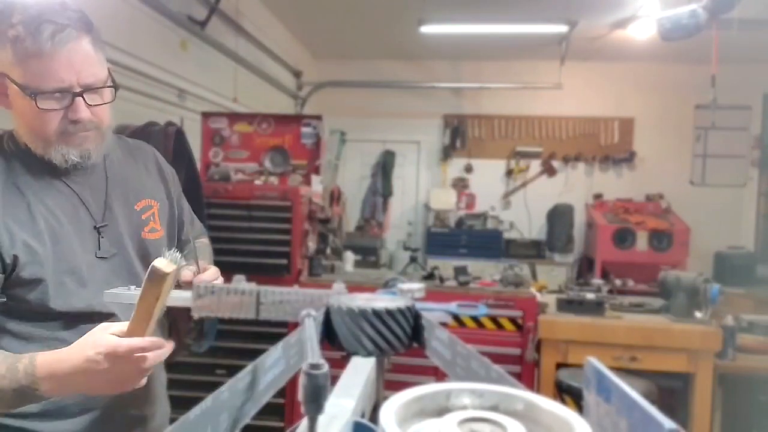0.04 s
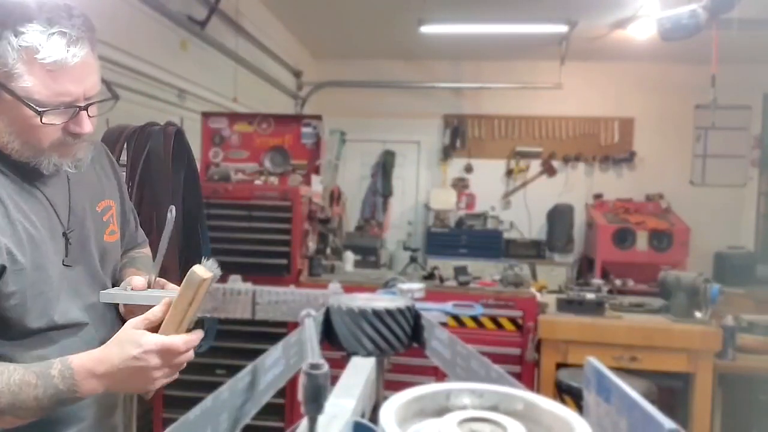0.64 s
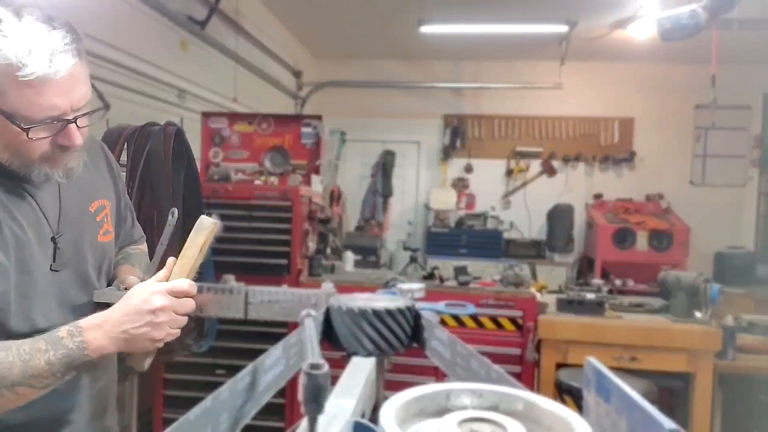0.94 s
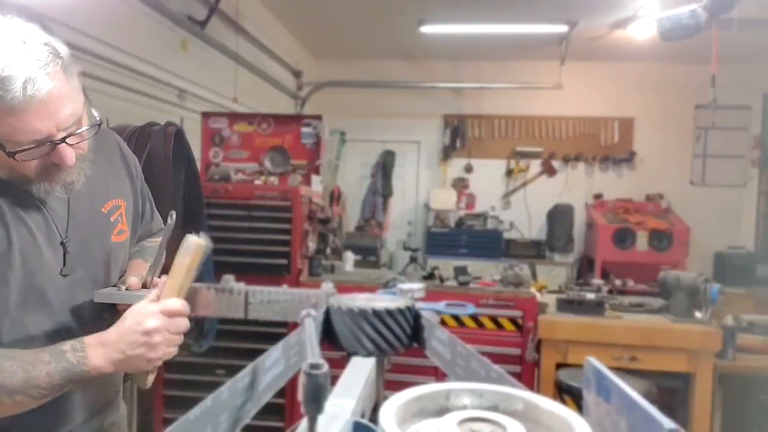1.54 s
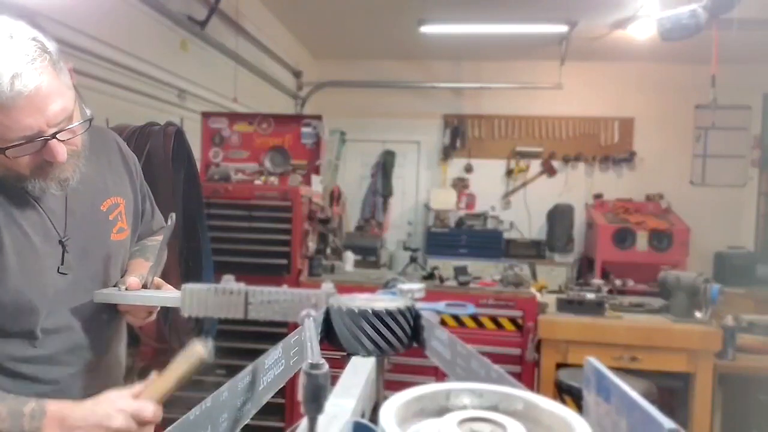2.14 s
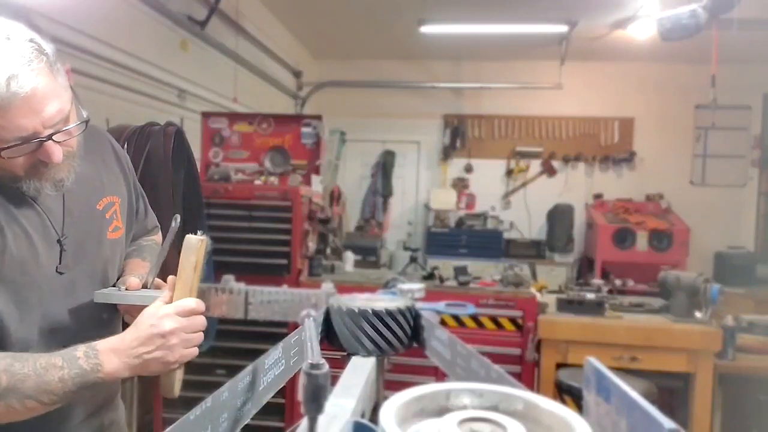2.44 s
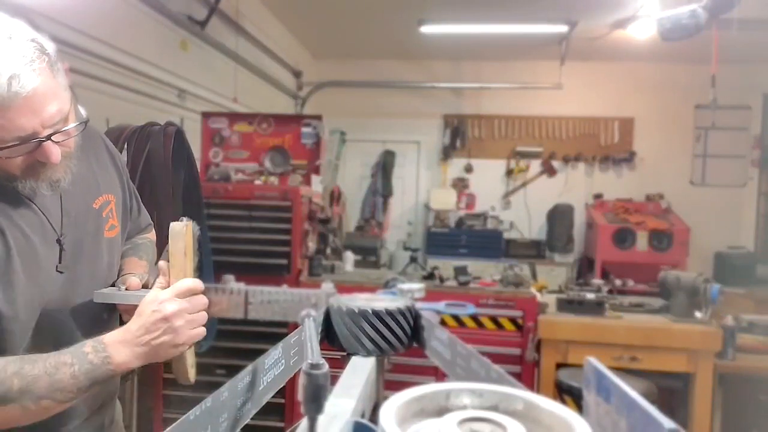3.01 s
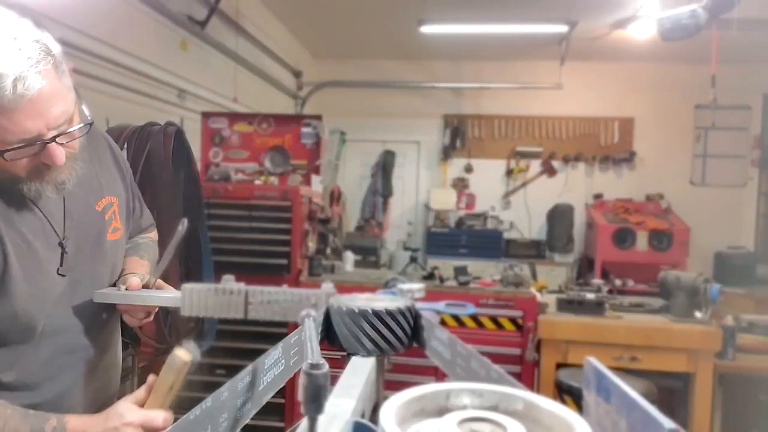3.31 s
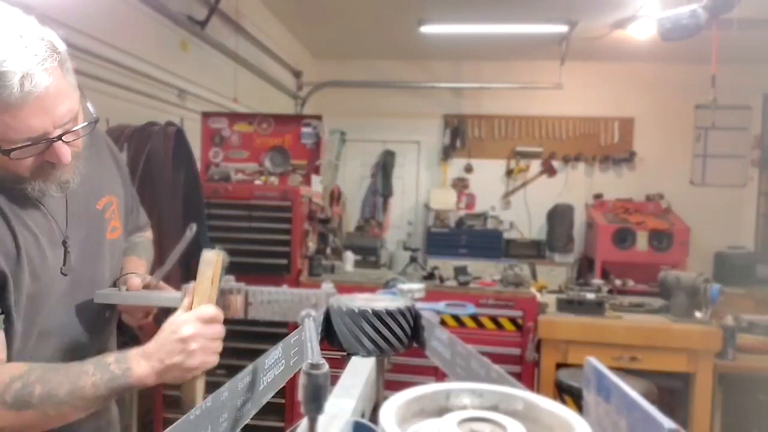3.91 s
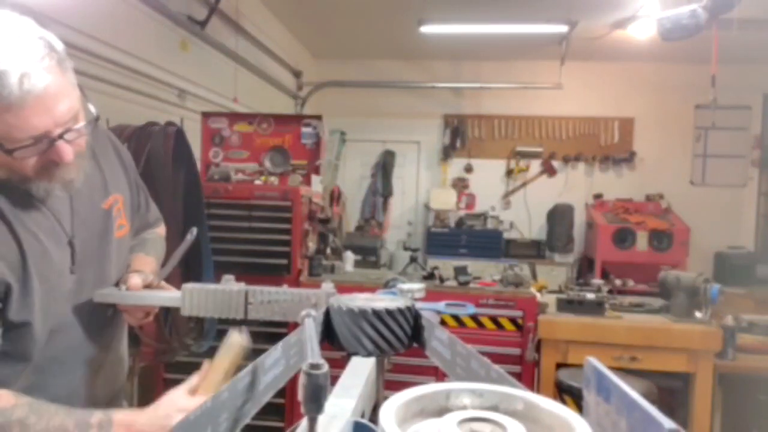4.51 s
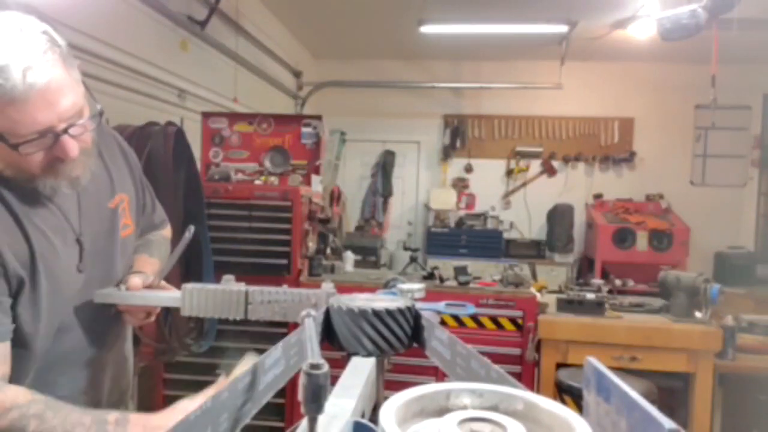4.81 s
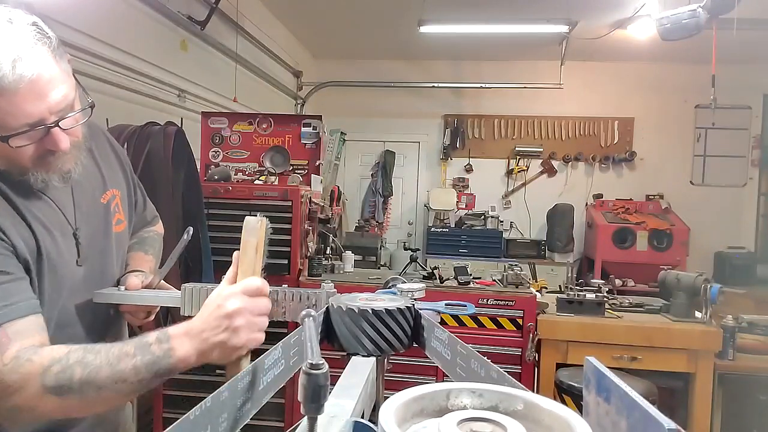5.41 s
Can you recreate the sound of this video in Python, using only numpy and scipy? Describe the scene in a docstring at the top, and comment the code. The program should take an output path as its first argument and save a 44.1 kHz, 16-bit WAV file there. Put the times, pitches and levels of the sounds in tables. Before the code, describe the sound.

Close, brisk wire brush strokes slap and rasp across steel, each shaking a metal stand into a low rumble.

```python
"""Wire brush on a steel blade

A garage, close up, with a stereo microphone standing on an idle belt grinder. A shoe scuffs and a blade
clanks and bumps down on the tool rest. A hand wire brush then slaps onto the steel, drags with a hiss
and flicks off the edge, stroke after stroke. Every blow shakes the grinder's frame into a low rumble
that reaches the microphone mostly through the metal, and the room throws the hiss back."""
import sys
import numpy as np
from scipy import signal
from scipy.fft import rfft, irfft, next_fast_len
from scipy.io import wavfile
from scipy.ndimage import uniform_filter1d

SR = 44100
rng = np.random.default_rng(int(sys.argv[2]) if len(sys.argv) > 2 else 0)


def wav_out(sig):
    """Save sig, one row per channel (or a flat mono array), as 16-bit PCM at SR to the path in sys.argv[1]."""
    wavfile.write(sys.argv[1], SR, np.round(np.clip(np.atleast_2d(sig).T, -1, 1) * 32767).astype(np.int16))


N = 244755
TIME = np.arange(N) / SR


def amp(db):
    """Decibels to gain."""
    return 10 ** (np.asarray(db) / 20)


def unit(x):
    """Scales to rms 1."""
    return x / np.sqrt(np.mean(x ** 2) + 1e-20)


def read(points, hz):
    """Reads a table along a log-frequency axis."""
    freq_hz, value = np.transpose(points)
    return np.interp(np.log(hz + 1), np.log(freq_hz + 1), value)


def add(mix, start_s, sound):
    """Mixes a sound in at start_s."""
    part = mix[max(round(start_s * SR), 0):][:len(sound)]
    part += sound[:len(part)]


def colour(x, spectrum, size=4096):
    """Causal filter with the shape of a spectrum; white noise keeps its power."""
    log_gain = np.log(amp(read(spectrum, abs(np.fft.fftfreq(size, 1 / SR)))))
    taps = np.fft.ifft(np.exp(np.conj(signal.hilbert(log_gain)))).real[:size // 2]
    return signal.oaconvolve(x, taps / np.linalg.norm(taps))[:N]


def drift(hz):
    """Random wander of rms 1, mostly slower than hz."""
    rolloff = 1 + (np.fft.rfftfreq(N, 1 / SR) / hz) ** 4
    return unit(irfft(rfft(rng.standard_normal(N)) / rolloff, N))


def slips(per_s, spread_db):
    """Tiny clicks of uneven size: wires or grit catching and letting go."""
    size = amp(spread_db * np.minimum(rng.exponential(1, N), 4)) * rng.standard_normal(N)
    return unit(size * (rng.random(N) < per_s / SR))


def burst(start_s, rise_s, fall_s):
    """Envelope of a cluster of contacts."""
    age = np.maximum(TIME - start_s, 0)
    return np.minimum(age / rise_s, 1) * np.exp(-np.maximum(age - rise_s, 0) / fall_s)


def ringing(modes):
    """One second of struck modes, with alternating signs and unit starting power."""
    t = TIME[:SR]
    power = sum(amp(db) ** 2 for _, db, _ in modes) / 2
    return sum((-1) ** k * amp(db) * np.exp(-np.log(1000) * t / t60) * np.sin(2 * np.pi * hz * t)
               for k, (hz, db, t60) in enumerate(modes)) / np.sqrt(power)


def chattering(modes, hits, relative_width):
    """Modes struck at (start_s, level_db); loose contact smears each into a narrow band of noise."""
    strikes, out = np.zeros((2, N))
    contact_samples = SR // 300
    for start_s, db in hits:
        add(strikes, start_s, np.full(contact_samples, amp(db) ** 2 / contact_samples))
    size = next_fast_len(N, True)
    hz, noise = np.fft.rfftfreq(size, 1 / SR), rfft(rng.standard_normal(size))
    for centre, db, t60 in modes:
        band = unit(irfft(noise / (1 + ((hz - centre) / (relative_width * centre)) ** 2), size)[:N])
        energy = signal.lfilter([1], [1, -np.exp(-2 * np.log(1000) / t60 / SR)], strikes + 1e-24)
        out += amp(db) * band * np.sqrt(energy)
    return out / np.sqrt(sum(amp(db) ** 2 for _, db, _ in modes))


# The garage with nothing moving: freq_hz, level_db
ROOM_TONE_SPECTRUM = [(20, -17), (60, 0), (120, -13), (250, -28), (1000, -39), (4000, -37), (8000, -38),
                      (15600, -44)]
def room_tone():
    """Faint, steady noise, mostly bass."""
    return colour(rng.standard_normal(N), ROOM_TONE_SPECTRUM)


# Scuffs on the concrete floor: start_s, level_db
SHOE_SCUFFS = [(0, -61.5), (.093, -45.5)]
# The sliding sole: freq_hz, level_db
SOLE_SPECTRUM = [(100, -22), (350, -17), (580, -7), (900, -18.5), (1250, -10), (1550, -13.5), (2100, -0.5),
                 (2450, -9), (2750, -4), (3400, -7.5), (4600, -13.5), (6500, -21.5), (10000, -25.5),
                 (15600, -28)]
def shoe(rise_s=0.012, fall_s=0.067):
    """Grit catches and slips under a sole."""
    slide = sum(amp(db) * burst(start_s, rise_s, fall_s) for start_s, db in SHOE_SCUFFS)
    return colour(slide * slips(per_s=6300, spread_db=2.5), SOLE_SPECTRUM)


# The brush lands on the blade or grazes it: start_s, slap_db, ping_hz, ping_db, push_db, clatter_db
BRUSH_LANDINGS = [(0.332, -84, 4100, -61.5, -94, -92), (0.828, -53, 3800, -56.5, -35.5, -65),
                  (0.853, -75, 3950, -82, -54, -73), (0.967, -73, 3900, -77, -50, -62),
                  (1.4638, -38, 3800, -45.5, -22, -41), (1.8563, -34, 3430, -39, -22, -38),
                  (2.344, -65.5, 2880, -56, -31, -75), (2.965, -38, 3680, -41, -23, -41.5),
                  (3.412, -35, 2370, -47.5, -22, -40), (3.8035, -37, 3730, -46, -25, -53.5),
                  (4.217, -34.5, 2230, -37, -24, -49.5), (4.596, -33, 3540, -40, -23.5, -46),
                  (4.9885, -29, 6000, -42.5, -21.5, -36.5), (5.347, -82, 5020, -62, -39, -57),
                  (5.399, -29, 3760, -42, -23, -42.5)]
# Wire tips hitting steel, close up: freq_hz, level_db
SLAP_SPECTRUM = [(150, -10), (500, 5), (950, -9.5), (1450, -1.5), (2100, 7), (3000, 5.5), (4500, -7.5),
                 (5200, 4.5), (6500, -2.5), (7700, -0.5), (9500, -2), (11200, -11.5), (15600, -3)]
def brush_slaps(rise_s=0.0023, fall_s=0.0084, ping_width_hz=240):
    """The tips land within a few milliseconds and the struck tuft pings."""
    tips, pings = np.zeros((2, N))
    radius = np.exp(-np.pi * ping_width_hz / SR)
    for start_s, slap_db, ping_hz, ping_db, *_ in BRUSH_LANDINGS:
        contact = burst(start_s, rise_s, fall_s)
        tips += amp(slap_db) * contact
        shake = amp(ping_db) * contact * rng.standard_normal(N)
        pole = radius * np.exp(2j * np.pi * ping_hz / SR)
        pings += signal.lfilter([np.sqrt(2 * (1 - radius ** 2))], [1, -pole], shake + 1e-18).real
    return colour(tips * slips(per_s=7700, spread_db=2.1), SLAP_SPECTRUM) + amp(5) * pings


# The sheen of the brush's ringing wires: freq_hz, level_db
WIRE_SPECTRUM = [(800, -27.5), (1500, -20), (1800, 2.5), (2400, -1), (3100, -26), (4100, 0), (5200, 2),
                 (6200, -0.5), (7300, -17.5), (15600, -32)]
def wire_ring(brush, sheen_db=-14, t60_s=0.39, tuft_hz=1980, tuft_width_hz=260, tuft_db=-20):
    """Hundreds of unequal wires store the stroke's energy and ring on; many share one hollow pitch."""
    decay = np.exp(-2 * np.log(1000) / t60_s / SR)
    energy = signal.lfilter([1 - decay], [1, -decay], brush ** 2 + 1e-20)
    band = 1 / (1 + (2 * (np.fft.rfftfreq(N, 1 / SR) - tuft_hz) / tuft_width_hz) ** 2)
    sheen = colour(rng.standard_normal(N), WIRE_SPECTRUM)
    hollow = unit(irfft(rfft(rng.standard_normal(N)) * band, N))
    return np.sqrt(energy) * (amp(sheen_db) * sheen + amp(tuft_db) * hollow)


# The blade knocks and shifts on the tool rest: start_s, scrape_db, ring_db, push_db, clatter_db
BLADE_KNOCKS = [(0.427, -46, -38.5, -36, -38.5), (0.682, -39.5, -56, -23, -37.5),
                (0.985, -82, -80, -51, -54), (1.246, -50.5, -73, -50, -53.5), (1.319, -63, -88, -54, -56),
                (3.301, -74, -85, -64, -63)]
# Steel scraping on the rest: freq_hz, level_db
SCRAPE_SPECTRUM = [(200, -1), (600, 10), (1000, 6.5), (2000, 4.5), (3500, 6), (5000, -5), (7500, -7.5),
                   (11000, -11), (15600, -14)]
# The blade's ring: pitch_hz, level_db, t60_s
BLADE_MODES = [(1460, -7.5, 0.6), (2070, -11, 0.61), (2930, -29, 0.23), (3320, 6.5, 0.38), (3270, 10, 0.13),
               (3978, -7.5, 0.97), (4170, 5, 0.12), (5920, -8, 0.51), (6480, -9, 0.35), (8140, -21, 0.17),
               (8400, -13, 0.25), (9900, -30, .2)]
def blade(rise_s=0.0048, fall_s=0.015):
    """The steel scrapes and rings as it meets the rest."""
    scrape = sum(amp(db) * burst(start_s, rise_s, fall_s) for start_s, db, *_ in BLADE_KNOCKS)
    grit = slips(per_s=6000, spread_db=2.5)
    hits = [(start_s, ring_db) for start_s, _, ring_db, *_ in BLADE_KNOCKS]
    ring = chattering(BLADE_MODES, hits, relative_width=0.022)
    return colour(scrape * grit, SCRAPE_SPECTRUM) + amp(-3) * ring


def blows(rock_delay_s=0.07):
    """Landings, knocks and the blade rocking back after each stroke: start_s, push_db, clatter_db."""
    hits = [(start_s, push, clatter) for start_s, *_, push, clatter in BRUSH_LANDINGS + BLADE_KNOCKS]
    rocks = [(leave_s + rock_delay_s, db - 2, db - 24.5) for _, leave_s, *_, db in BRUSH_STROKES]
    return hits + rocks


# The grinder's frame, right under the microphone: pitch_hz, level_db, t60_s
FRAME_MODES = [(51.1, -4.5, 1.8), (59.64, -5.5, 2.24), (73.34, -2.5, 1.42), (83.87, -1.5, 1.04),
               (95.66, -3, 0.76), (117.2, -1.5, 0.52), (109.5, 9.5, 0.12), (150.6, -3.5, 0.62),
               (176.3, -9, 1.05), (223.2, -6.5, 0.66)]
# Its loose parts: freq_hz, level_db
RATTLE_SPECTRUM = [(25, -30), (50, -4.5), (85, 5.5), (160, -8), (260, -24.5), (550, -35.5), (900, -44),
                   (3000, -54.5)]
def grinder_frame(judder_gain, lag_s=0.01011, contact_s=0.0011, judder_hz=90):
    """Blows and the judder of the drag shake the frame; its loose parts rattle briefly."""
    force, loose = np.zeros((2, N))
    contact_age = TIME[:SR // 20] / contact_s
    push = contact_age * np.exp(-contact_age)
    for start_s, push_db, _ in blows():
        add(force, start_s + lag_s, amp(push_db) * push / push.sum())
        loose += amp(push_db) * burst(start_s, rise_s=0.011, fall_s=0.15)
    ring = ringing(FRAME_MODES)
    thumps = signal.oaconvolve(force, ring)[:N]
    shudder = signal.sosfilt(signal.butter(2, judder_hz, fs=SR, output="sos"), rng.standard_normal(N))
    judder = signal.oaconvolve(shudder * judder_gain, ring)[:N]
    judder /= np.std(signal.oaconvolve(shudder, ring)[:N])
    rattle = colour(loose * rng.standard_normal(N), RATTLE_SPECTRUM)
    return amp(3) * thumps + amp(6.5) * judder + amp(-9) * rattle


# The tool rest and the arm that carries it: pitch_hz, level_db, t60_s
REST_MODES = [(163.3, 6, 0.12), (231, -2, 0.84), (305.7, 1.5, 0.57), (381.5, -0.5, 0.64), (433.2, -1, 0.6),
              (518, -8.5, 0.76), (573.5, -2, 0.59), (658, -13, 0.72), (798, -15.5, 0.63), (980, -15, 0.54)]
ARM_MODES = [(91, 10.5, 0.112), (143.3, 1.5, 0.65), (172.5, -4, 0.75), (219.4, -7, 0.55),
             (301, -13.5, 0.31)]
def tool_rest(lag_s=0.0063, boom_s=0.689):
    """The rest clatters under every blow; its arm booms once, when the blade's weight drops on it."""
    hits = [(start_s + lag_s, clatter_db) for start_s, _, clatter_db in blows()]
    out = amp(-1) * chattering(REST_MODES, hits, relative_width=0.021)
    add(out, boom_s, amp(-19) * ringing(ARM_MODES))
    return out


# Drags across the blade; slow_db is the hiss before the brush speeds up, relative to full speed:
# speed_up_s, leave_s, slow_db, hiss_db, rasp_db, flick_db, judder_db
BRUSH_STROKES = [(1.039, 1.162, -10, -35.5, -44.5, -34.5, -49), (1.496, 1.584, -18, -33.5, -40, -38, -42.5),
                 (1.865, 1.974, -21, -34, -39, -35.5, -45), (2.454, 2.568, -15, -33, -40, -32.5, -47.5),
                 (3.002, 3.141, -19, -35.5, -42, -34, -40), (3.447, 3.557, -17, -35.5, -40, -36, -41),
                 (3.818, 3.966, -12, -37.5, -46, -32, -42), (4.237, 4.362, -9, -38, -46.5, -30.5, -41),
                 (4.632, 4.745, -13, -36.5, -44, -30, -35), (5.01, 5.183, -10, -37.5, -46.5, -34.5, -37),
                 (5.43, 5.59, -9, -34, -46, -32, -38.5)]
def brush_drag(bend_s=0.015, gather_s=0.014, release_s=0.0064, slow_rasp_db=-16.5,
               climb_db_per_s=24.5, ease_db_per_s=12, dig_db=-8):
    """Gains of hiss, rasp and judder: the wires bend, dig in, gather speed and run off the edge."""
    hiss, rasp, judder = np.zeros((3, N))
    for speed_up_s, leave_s, slow_db, hiss_db, rasp_db, _, judder_db in BRUSH_STROKES:
        land_s = max(start_s for start_s, *_ in BRUSH_LANDINGS if start_s < speed_up_s)
        grab = np.clip((TIME - land_s) / bend_s, 0, 1)
        touch = grab * np.exp(-np.maximum(TIME - leave_s, 0) / release_s)
        slow = 0.5 - 0.5 * np.tanh((TIME - speed_up_s) / (2 * gather_s))
        to_edge_s = leave_s - np.clip(TIME, land_s, leave_s)
        # The hiss climbs as the hand accelerates; the rasp eases as the pressure comes off.
        hiss += touch * amp(hiss_db + slow_db * slow - climb_db_per_s * to_edge_s)
        rasp += touch * amp(rasp_db + slow_rasp_db * slow + ease_db_per_s * to_edge_s)
        judder += touch * amp(judder_db)
    dig = sum(amp(slap_db + dig_db) * burst(start_s, rise_s=0.0035, fall_s=0.068)
              for start_s, slap_db, *_ in BRUSH_LANDINGS)
    return hiss, np.hypot(rasp, dig), judder


# The bright hiss and lower rasp of wire on steel, close up: freq_hz, level_db
HISS_SPECTRUM = [(300, -55), (1200, -14.5), (3000, -2), (4000, 5.5), (5500, 3.5), (6800, 0.5), (7900, -2),
                 (9400, 2), (11000, 0), (13800, 3.5), (15000, 7.5), (15700, -1)]
RASP_SPECTRUM = [(100, -3), (300, 2.5), (550, -5.5), (850, -6.5), (1450, -5), (1900, -3.5), (2500, 4),
                 (3200, -1), (4500, -2), (8000, -59)]
def brush_scrub(hiss_gain, rasp_gain, roughness_db=2):
    """Wire tips stick and slip; whole tufts catch together and roughen the level."""
    tufts = amp(roughness_db * drift(hz=113))
    hiss = hiss_gain * colour(slips(per_s=9000, spread_db=-1.5), HISS_SPECTRUM)
    rasp = rasp_gain * colour(slips(per_s=3600, spread_db=2.5), RASP_SPECTRUM)
    return tufts * (amp(-2) * hiss + amp(-4) * rasp)


# Wires springing off the blade's edge: freq_hz, level_db
FLICK_SPECTRUM = [(500, -16), (1500, -19), (2200, -4), (3200, -6), (4200, -5.5), (5400, 5.5), (6500, -9),
                  (7800, -13), (9500, 0), (13000, -18), (15600, -4.5)]
def brush_flicks(spread_s=0.0043):
    """Bent wires snap free at the end of each stroke."""
    release = sum(amp(flick_db) * np.exp(-0.5 * ((TIME - leave_s) / spread_s) ** 2)
                  for _, leave_s, *_, flick_db, _ in BRUSH_STROKES)
    return colour(release * slips(per_s=8000, spread_db=1.8), FLICK_SPECTRUM)


# The garage's decay: freq_hz, t60_s
GARAGE_DECAY = [(100, .5), (500, 0.26), (1300, 0.3056), (3400, 0.3834), (5200, .5), (7500, 0.32),
                (10000, 0.2949), (15600, 0.21)]
# Its echo at the microphone: freq_hz, level_db
ECHO_SPECTRUM = [(60, -34), (200, 1.5), (500, 2), (1500, 0.5), (5000, -3), (8000, -1), (15600, -0.5)]
def echoes(early_db=-2, early_fall_s=0.0084, gap_s=0.007, echoes_per_s=4000):
    """Reflections from near tools, then the room's tail, different at each side."""
    t = TIME[:SR]
    taps = rng.choice([-1., 1.], (2, SR)) * (rng.random((2, SR)) < echoes_per_s / SR) * (t > gap_s)
    hz, age, bands = signal.stft(taps, SR, nperseg=256)
    decay_per_s = np.log(1000) / read(GARAGE_DECAY, hz)[:, None]
    gain = amp(read(ECHO_SPECTRUM, hz))[:, None] * np.sqrt(2 * decay_per_s)
    _, tail = signal.istft(bands * gain * np.exp(-decay_per_s * age), SR, nperseg=256)
    near = rng.standard_normal((2, SR)) * np.exp(-t / early_fall_s)
    early = signal.lfilter(*signal.butter(1, 600, "high", fs=SR), near) / np.linalg.norm(near[0])
    return tail[:, :SR] / np.linalg.norm(taps[0]) + amp(early_db) * early


def garage(brush, stationary, tuft_count=3, left_lag_samples=8):
    """Tufts along the brush sound in turn, each with its own echoes; other sounds stay in one place."""
    direct = amp(-3) * brush + stationary
    out = np.array([np.pad(direct, (left_lag_samples, 0))[:N], direct])
    shares = uniform_filter1d(rng.standard_normal((tuft_count, N)), size=300)
    places = brush * shares / np.linalg.norm(shares, axis=0)
    places[0] += stationary
    for sound in places:
        out += signal.oaconvolve(sound[None], echoes(), axes=1)[:, :N]
    return out


def scene():
    """Brush, blade and shoe arrive through the air, the grinder's shaking mostly through the metal."""
    hiss_gain, rasp_gain, judder_gain = brush_drag()
    brush = amp(0.5) * (brush_scrub(hiss_gain, rasp_gain) + amp(2) * brush_slaps() + brush_flicks())
    shake = amp(-3.5) * (grinder_frame(judder_gain) + tool_rest())
    quiet = amp(-72) * room_tone()
    air = garage(brush + wire_ring(brush), blade() + amp(-7) * shake + amp(-1.5) * shoe() + quiet)
    return (air + shake) * amp([[0.3], [-0.3]])  # the left side is a touch louder


def record(dry, low_cut_hz=32, high_cut_hz=15980):
    """The microphone loses the deepest bass and the highest treble."""
    thin = signal.sosfilt(signal.butter(2, low_cut_hz, "high", fs=SR, output="sos"), dry)
    lowpass = signal.firwin(511, high_cut_hz, window=("kaiser", 8), fs=SR)
    return signal.oaconvolve(thin, lowpass[None], "same")


dry = scene()
out = record(dry)
wav_out(out)
```